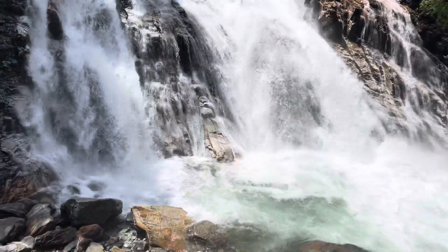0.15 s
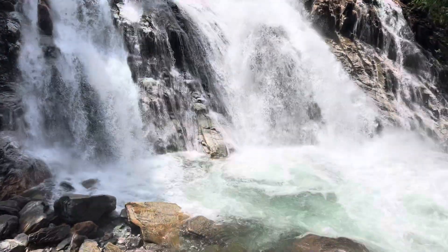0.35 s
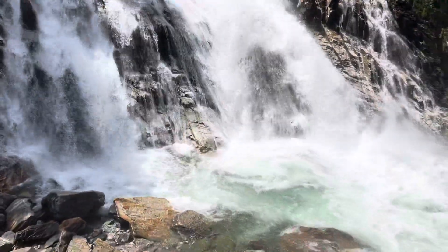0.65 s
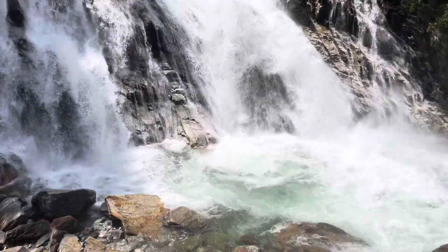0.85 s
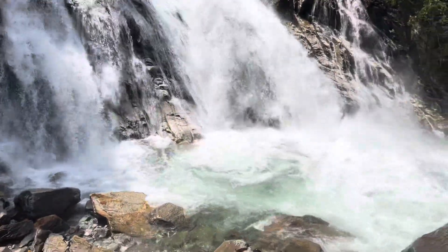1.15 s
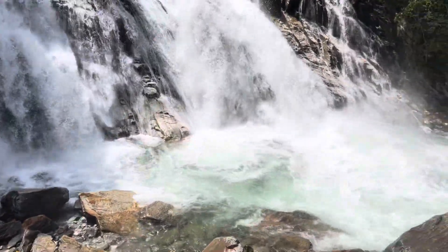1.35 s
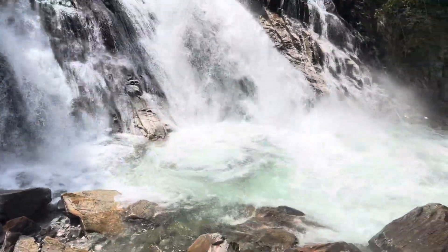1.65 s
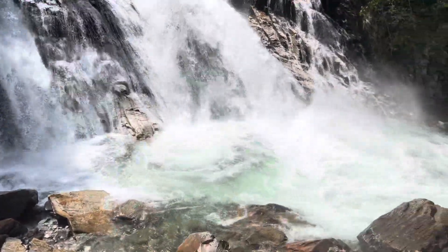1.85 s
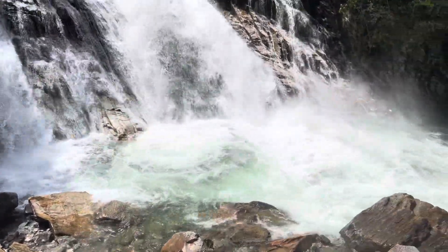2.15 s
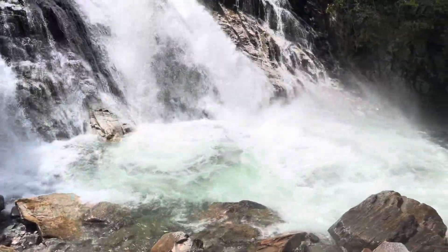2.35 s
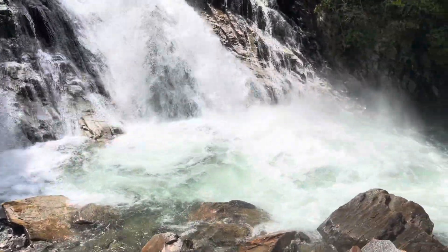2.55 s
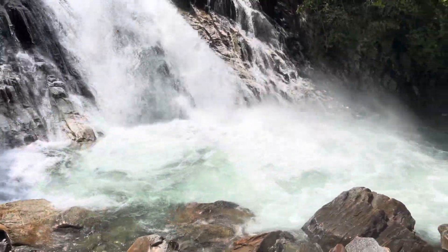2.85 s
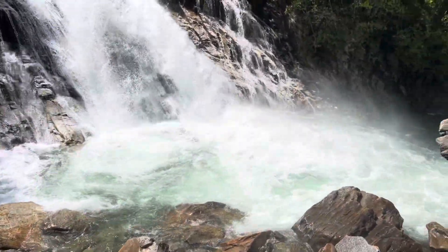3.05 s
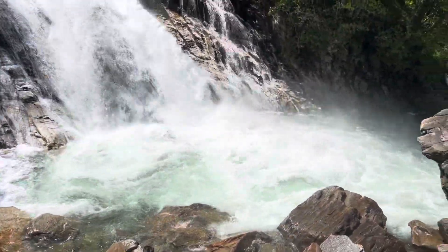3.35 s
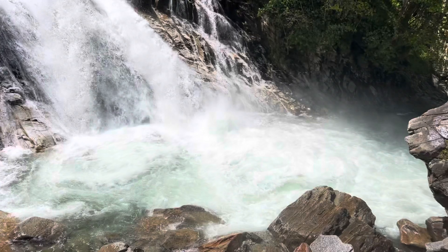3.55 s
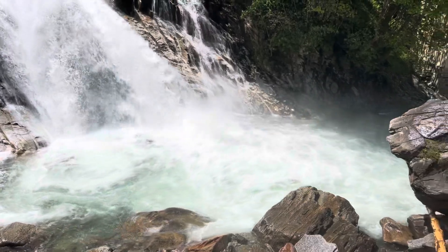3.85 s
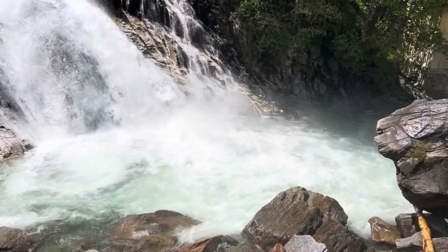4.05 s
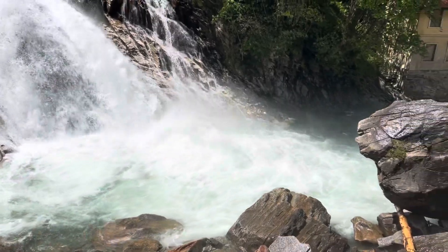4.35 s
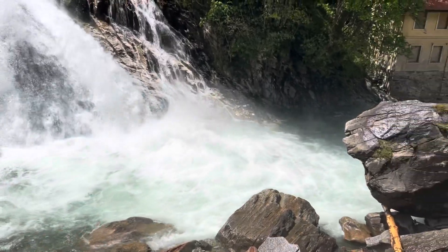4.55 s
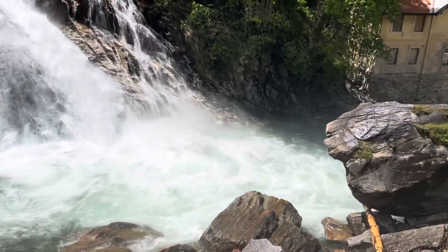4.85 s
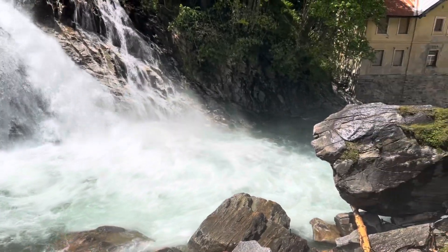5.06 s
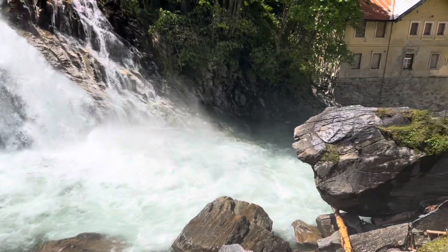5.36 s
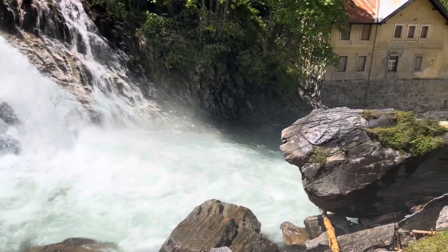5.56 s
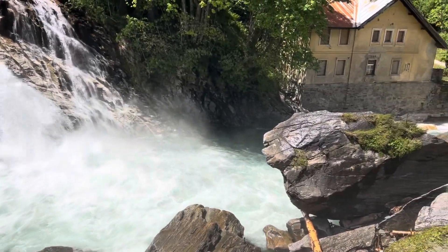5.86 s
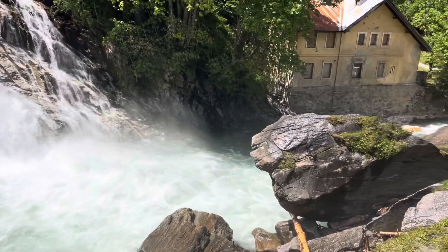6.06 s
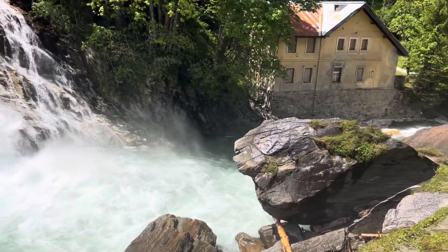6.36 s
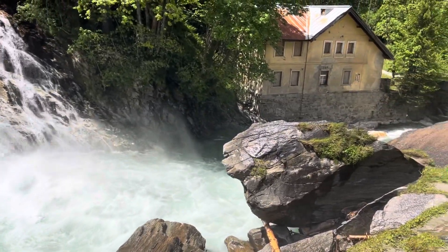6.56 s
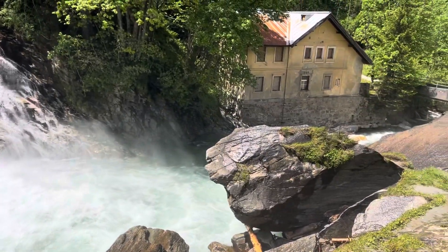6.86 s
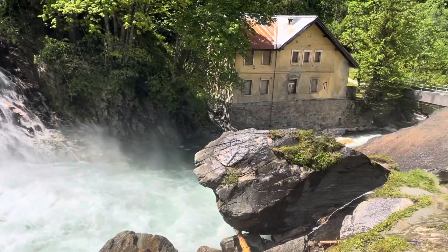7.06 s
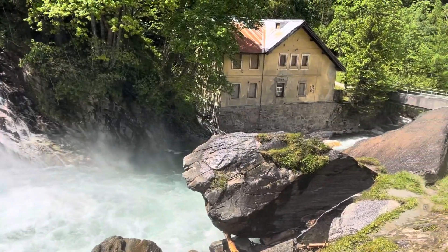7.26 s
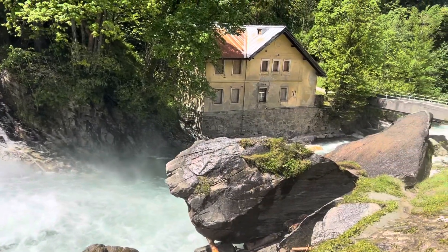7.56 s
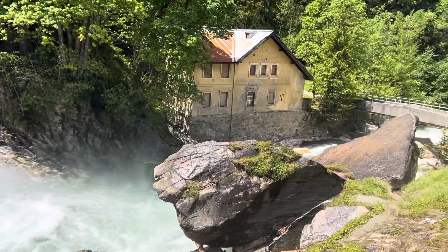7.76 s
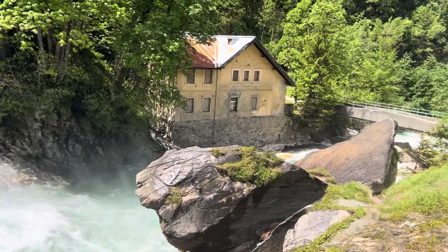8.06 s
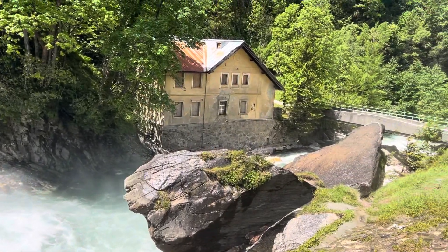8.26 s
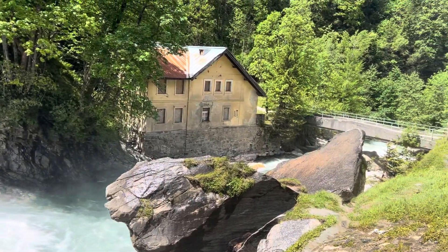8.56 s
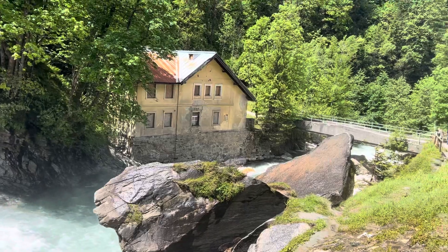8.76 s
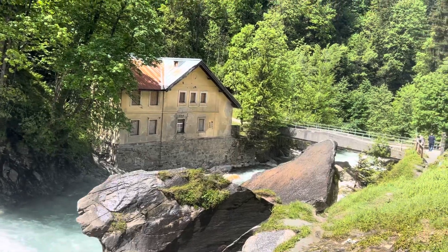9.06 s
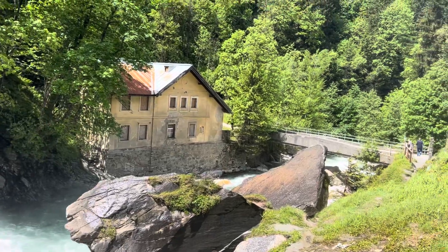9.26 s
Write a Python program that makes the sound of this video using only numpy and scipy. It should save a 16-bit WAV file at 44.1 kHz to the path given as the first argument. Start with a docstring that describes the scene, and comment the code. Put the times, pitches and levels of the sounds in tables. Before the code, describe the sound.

A big waterfall crashes into a rocky pool with a dense, smooth, unbroken roar. Spray-driven wind buffets a hand-held stereo microphone in low thuds and short flutters, notably near 2.7 seconds and hardest just after six. The microphone slowly turns away, so the roar shifts in colour and stereo image, and the bumps mostly settle near the end.

```python
"""Waterfall, microphones turning away

A large waterfall crashes over rocks into a pool; a hand-held pair of microphones turns slowly away from it.
The roar is dense, smooth noise, crossfaded from a facing to a turned-away colour and stereo image.
Spray wind buffets the microphone ports: bands of noise swell in low lumps and lift in short puffs.
Eddies that stand out from the wind knock the ports, each a brief bell-shaped swing of pressure."""
import sys
import numpy as np
from scipy import signal
from scipy.fft import rfft, irfft, next_fast_len
from scipy.io import wavfile
from scipy.ndimage import uniform_filter1d

SR = 44100
rng = np.random.default_rng(int(sys.argv[2]) if len(sys.argv) > 2 else 0)


def gain_from_db(level_db):
    """Turn a decibel level (scalar or array-like) into a linear amplitude factor."""
    decades = np.asarray(level_db, float) / 20
    return 10 ** decades


def dump(signal):
    """Clip the signal to [-1, 1] and save it as 16-bit WAV at the path in sys.argv[1]."""
    limited = np.clip(np.atleast_2d(signal).T, -1, 1)
    pcm = np.round(limited * 32767).astype(np.int16)
    wavfile.write(sys.argv[1], SR, pcm)


N = 414981
HZ = np.fft.rfftfreq(next_fast_len(N), 1 / SR) + 1e-3   # spectral lines, just above zero for the logarithm

# rise and fall of the spray wind on the ports, before puffs and gusts: start_s, thud_db, flutter_db
WIND_COURSE = [(0, -25, -25), (1.45, -25.5, -26.5), (1.62, -33, -27.5), (1.7, -25, -26), (2.38, -25.5, -28),
               (2.7, -20.5, -24), (2.8, -25, -24.5), (3.2, -23, -25), (3.5, -32.5, -29), (4.0, -37, -34.5),
               (4.45, -30, -27), (4.9, -27, -25), (5.3, -26, -27.5), (5.63, -35.5, -26), (6.05, -25, -25.5),
               (6.3, -18, -20.5), (6.55, -20.5, -20), (6.6, -31.5, -32.5), (7.4, -35.5, -38),
               (7.62, -33.5, -33), (8.4, -36, -35), (8.75, -34, -29.5), (9.41, -32, -32.5)]
# short puffs that lift the wind: centre_s, half_length_s (to 1/e of the lift), thud_lift_db, flutter_lift_db
WIND_PUFFS = [(1.73, .05, 5, 2), (2.51, .04, 4, 4), (2.728, 0.027, 4, 7), (2.877, .04, 6, 2.5),
              (5.34, .02, 7, 0), (5.48, .05, 4, 5), (6.246, 0.042, 2, 8.5), (6.892, 0.036, 4, 9),
              (7.96, .04, 10, 4), (9.03, .03, 3, 4), (9.2, .02, 2, 8)]
# colour of the lowest wind noise, relative: pitch_hz, level_db (per Hz)
THUD_COLOUR = [(22, -28), (35, -12), (50, -0.5), (85, 0.5), (125, -4.5), (180, -22), (400, -55)]
# colour of the wind noise above it, relative: pitch_hz, level_db (per Hz)
FLUTTER_COLOUR = [(70, -22), (115, -2.5), (170, -0.5), (260, 0), (400, -7.5), (600, -20), (1200, -56)]
# colour of the finest wind eddies, relative: pitch_hz, level_db (per Hz)
RASP_COLOUR = [(200, -25), (350, -6), (480, -2), (700, -2), (900, -19), (1500, -43)]
# stereo balance of wind and knocks: start_s, left_minus_right_db
WIND_BALANCE = [(0, -1), (4.3, -.5), (6.65, 1), (9.41, 0)]
# eddies that stand out from the wind around them and knock the ports:
# centre_s, peak_db (ceiling before balance), pitch_hz
PLACED_KNOCKS = [(0.026, -9, 130), (0.491, -11.5, 140), (1.238, -11, 100), (1.729, -10, 120),
                 (1.767, -9.5, 109), (2.146, -11, 110), (2.485, -9, 130), (2.522, -8, 210), (2.692, -7, 80),
                 (2.726, -3.5, 120), (2.745, -5.5, 80), (2.878, -7, 99), (3.028, -8.5, 211),
                 (3.382, -12, 110), (4.531, -10, 190), (4.843, -12, 130), (5.249, -12, 70),
                 (5.348, -12, 89.5), (5.443, -11, 119), (6.128, -8, 199), (6.235, -3.5, 109),
                 (6.261, -2, 170), (6.324, -7, 119), (6.465, -6, 200), (6.517, -6.5, 80), (6.889, -16, 170),
                 (7.949, -16, 80), (9.022, -11, 318), (9.199, -13.5, 231)]

# colour of the roar facing the fall: pitch_hz, level_db (per Hz)
FACING_COLOUR = [(60, -56), (170, -61.5), (430, -53), (800, -55), (1300, -58), (1800, -62), (2200, -63),
                 (3000, -65), (4500, -66.2), (6200, -70), (8000, -68), (11000, -70.5), (14500, -73.5),
                 (15700, -80.6)]
# colour of the roar turned away from the fall: pitch_hz, level_db (per Hz)
AWAY_COLOUR = [(60, -63), (170, -62.5), (350, -60), (550, -55), (800, -56.5), (1300, -59), (1800, -61.5),
               (2200, -62.5), (3000, -66.5), (4500, -68), (6200, -72.5), (8000, -71), (11000, -72.5),
               (14500, -76), (15700, -82)]
# stereo image facing, below the treble: pitch_hz, likeness (0-1), right_lag_rad, left_minus_right_db
FACING_IMAGE = [(170, 0.94, 0.09, -1.5), (430, 0.77, 0.14, -1.4), (700, 0.67, 0.28, -0.5),
                (1000, 0.53, 0.58, 1), (1250, 0.27, 0.63, 0.2), (1500, 0, 7.22, -0.1),
                (1800, 0.12, 5.5, -1.7), (2130, 0.75, 6.53, 2.5), (2700, 0.56, 7.4, 4),
                (3560, 0.8, 6.4, 3.5), (4500, 0.68, 7, 1.5), (5400, 0.6, 5.6, 1.5), (6200, 0.4, 5.2, 2.5),
                (6900, 0.86, 6.51, 4)]
# stereo image turned away, below the treble: pitch_hz, likeness (0-1), right_lag_rad, left_minus_right_db
AWAY_IMAGE = [(170, 0.79, -0.4, 0), (430, 0.56, 0.75, 1.3), (700, 0.76, 1.7, 2), (1000, 0.57, 2, 1),
              (1250, 0.57, 3, -0.5), (1480, 0.54, 4.5, -2.5), (1800, 0.46, 5.42, -2), (2140, 0.9, 6, -0.3),
              (2650, 0.67, 8, 4), (3540, 0.88, 7, 5), (4500, 0.43, 7.5, 2.5), (5400, 0.43, 4.5, 2.5),
              (6200, 0.3, 6, 3), (6900, 0.82, 7, 2)]
# phase of the right port ahead of the left in the treble, less whole cycles: pitch_hz, right_phase_cycles
TREBLE_PHASE = [(7050, -.06), (7600, 0.), (8100, .09), (9600, .5), (11600, 1.), (12300, 1.17), (13400, 1.5),
                (14100, 1.84), (16000, 2.05)]
# slow turn of the microphones: start_s, share_turned_away (0-1)
MICROPHONE_TURN = [(0, 0.05), (2.5, 0.09), (4, .4), (5.5, 0.51), (7, .9), (9.41, 1.)]
# level of the roar's body, hollow for a second after the strongest gust: start_s, level_db
BODY_LEVEL = [(0, 0), (3.6, 0), (4.1, -1), (4.6, 0), (6.55, -.5), (6.65, -4), (6.9, -2), (7.05, -6.5),
              (7.4, -4.5), (7.6, -0.3), (9.41, 0)]
# level of the spray above the body: start_s, level_db
SPRAY_LEVEL = [(0, 0), (2, 0.6), (7.6, 1.13), (9.41, -.5)]


def rms_one(x):
    """Scale to rms 1."""
    return x / np.sqrt(np.mean(x ** 2) + 1e-20)


def in_time(rows):
    """Columns of a curve table, one value a sample."""
    s, *columns = np.transpose(rows)
    return [np.interp(np.arange(N) / SR, s, column) for column in columns]


def in_pitch(rows):
    """Columns of a frequency table, one value a spectral line, straight over log frequency."""
    hz, *columns = np.transpose(rows)
    return [np.interp(np.log(HZ), np.log(hz), column) for column in columns]


def white():
    """Spectral lines of white noise, 0 dB per Hz."""
    return rfft(rng.standard_normal(next_fast_len(N))) * np.sqrt(SR / 2)


def sound(lines):
    """Spectral lines back to samples."""
    return irfft(lines, next_fast_len(N))[..., :N]


def drift(rate_hz):
    """Slow chance: noise twice through a one-pole low-pass; rms 1."""
    r = np.exp(-2 * np.pi * rate_hz / SR)
    slow = signal.lfilter([1], [1, -2 * r, r * r], rng.standard_normal(N + SR))
    return rms_one(slow[SR:])   # the first second lets the filter settle


def pair(shared, other, likeness, lag_rad):
    """Left is one noise; right is part of it, shifted in phase, topped up with another."""
    likeness = np.clip(likeness, 0, 1)
    common = likeness * shared * np.exp(-1j * lag_rad)
    own = np.sqrt(1 - likeness ** 2) * other
    return np.array([shared, common + own])


def wind_levels():
    """Thud and flutter in dB: the course of the wind with a bell-shaped lift for each puff."""
    levels_db, t = np.array(in_time(WIND_COURSE)), np.arange(N) / SR
    for centre_s, half_length_s, *lift_db in WIND_PUFFS:
        bell = np.exp(-((t - centre_s) / half_length_s) ** 2)
        levels_db = levels_db + np.outer(lift_db, bell)
    return levels_db


def wind(lumpy_db=0.7, own_db=0.6, gusty_db=2.5):
    """Eddies pass the ports: lumps of pressure swell thud, flutter and rasp together, each also alone."""
    thud_db, flutter_db = wind_levels()
    thud_db = thud_db + gusty_db * np.tanh(drift(9))
    flutter_db = flutter_db + gusty_db * np.tanh(drift(9))
    # strong gusts shed finer eddies: 1.7 dB of rasp per dB of flutter
    rasp_db = -25.5 + 1.7 * (flutter_db + 15)
    lumps_db = lumpy_db * drift(20)
    out = 0
    for colour, level_db in ((THUD_COLOUR, thud_db), (FLUTTER_COLOUR, flutter_db), (RASP_COLOUR, rasp_db)):
        lines = pair(white(), white(), likeness=0.85, lag_rad=-0.15)
        eddies = sound(lines * gain_from_db(in_pitch(colour)[0]))
        lumpy = eddies * gain_from_db(lumps_db + own_db * drift(25))
        out = out + gain_from_db(level_db) * rms_one(lumpy)
    return out


def chance_knocks(count=45, above_db=11, spread_db=2.5, low_hz=75.3, high_hz=262):
    """Further eddies by chance, evenly on average, their peaks set above the flutter in the wind's course."""
    when, strength, pitch = rng.random((count, 3)).T
    centre_s = (np.arange(count) + when) * (N - 1) / SR / count
    flutter_db = in_time(WIND_COURSE)[1][(centre_s * SR).astype(int)]
    peak_db = flutter_db + above_db + spread_db * (2 * strength - 1)
    pitch_hz = low_hz * (high_hz / low_hz) ** pitch
    return list(zip(centre_s, peak_db, pitch_hz))


def knocks(cycles=0.59, snap_share=0.42, snap_ratio=1.99, side_rad=0.36):
    """Each eddy is a bell-shaped swing or two of pressure with a finer one on it, unlike in the two ports."""
    rows = list(PLACED_KNOCKS) + chance_knocks()
    out = np.zeros((2, N))
    chance = rng.uniform(-1, 1, (len(rows), 4))
    for (centre_s, peak_db, pitch_hz), (phase, snap_phase, spread, skew) in zip(rows, chance):
        first = max(int((centre_s - 3 / pitch_hz) * SR), 0)
        last = min(int((centre_s + 3 / pitch_hz) * SR), N)
        at = np.arange(first, last)
        turns = (at / SR - centre_s) * pitch_hz
        lag = side_rad * skew * np.array([[1], [-1]])
        swing = np.cos(2 * np.pi * turns + np.pi * phase + lag)
        snap_turns = turns * (snap_ratio + 0.5 * spread)
        snap = np.cos(2 * np.pi * snap_turns + np.pi * snap_phase - lag)
        bell = np.exp(-0.5 * (turns / cycles) ** 2)
        out[:, at] += gain_from_db(peak_db) * bell * ((1 - snap_share) * swing + snap_share * snap)
    return out


def buffeted_ports():
    """Wind and knocks at the ports; all the wind noise is lowered around each knock."""
    knocking, buffeting = knocks(), wind()
    push = np.sqrt(uniform_filter1d(np.mean(knocking ** 2, axis=0), size=600) + 1e-12)
    churn = np.sqrt(uniform_filter1d(np.mean(buffeting ** 2, axis=0), size=2400) + 1e-12)
    buffeting = buffeting / (1 + 0.48 * push / churn)
    return (buffeting + knocking) * gain_from_db(in_time(WIND_BALANCE)[0] * [[0.5], [-0.5]])


def roar(colour, image, split_hz=1420):
    """Countless bursting bubbles and splashes blur into noise, heard from one direction: body and spray."""
    likeness, lag_rad, balance_db = in_pitch(image)
    # in the treble both ports hear the same spray, apart in phase
    treble = HZ > TREBLE_PHASE[0][0]
    likeness[treble], balance_db[treble] = 1, 0
    lag_rad[treble] = -2 * np.pi * in_pitch(TREBLE_PHASE)[0][treble]
    lines = pair(white(), white(), likeness, lag_rad)
    lines = lines * gain_from_db(in_pitch(colour)[0] + balance_db * [[0.5], [-0.5]])
    body_share = 1 / (1 + (HZ / split_hz) ** 4)
    return sound(lines * body_share), sound(lines * (1 - body_share))


def waterfall(surge_db=0.66):
    """Falling sheets of water arrive in small surges; the turn fades directions at constant power."""
    turn = np.clip(in_time(MICROPHONE_TURN)[0], 0, 1)
    facing = np.array(roar(FACING_COLOUR, FACING_IMAGE))
    away = np.array(roar(AWAY_COLOUR, AWAY_IMAGE))
    body, spray = np.sqrt(1 - turn) * facing + np.sqrt(turn) * away
    body_db = in_time(BODY_LEVEL)[0] + 0.5 * surge_db * drift(5.7) + surge_db * drift(7.0)
    spray_db = in_time(SPRAY_LEVEL)[0] + 0.5 * surge_db * drift(7.0)
    return gain_from_db(body_db) * body + gain_from_db(spray_db) * spray


def scene():
    """The waterfall, with the wind and its knocks at the microphones."""
    return buffeted_ports() + waterfall()


def roll_off(x):
    """The treble ends steeply here."""
    return signal.sosfilt(signal.butter(12, 15800, fs=SR, output="sos"), x)


def record(dry):
    """Low cut of the microphones at 40 Hz, then rounded peaks."""
    low_cut = signal.butter(3, 40, "high", fs=SR, output="sos")
    mix = signal.sosfilt(low_cut, dry)
    mix = 1.11 * np.tanh(mix / 1.096)
    return roll_off(mix)


dry = scene()
out = record(dry)
dump(out)
```